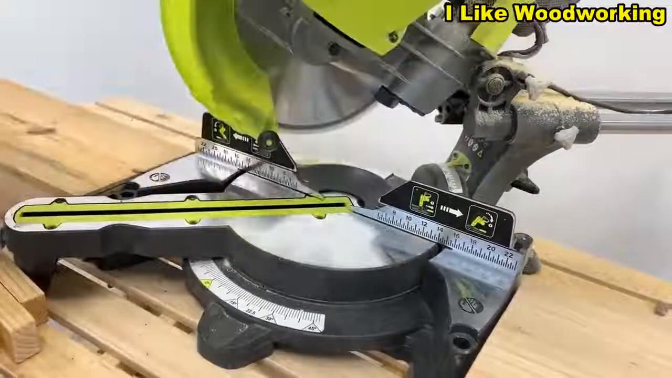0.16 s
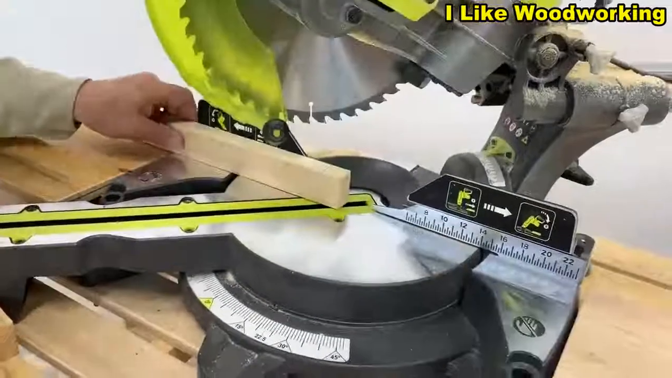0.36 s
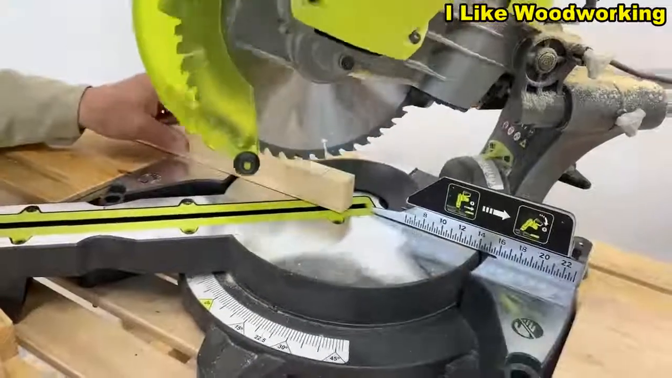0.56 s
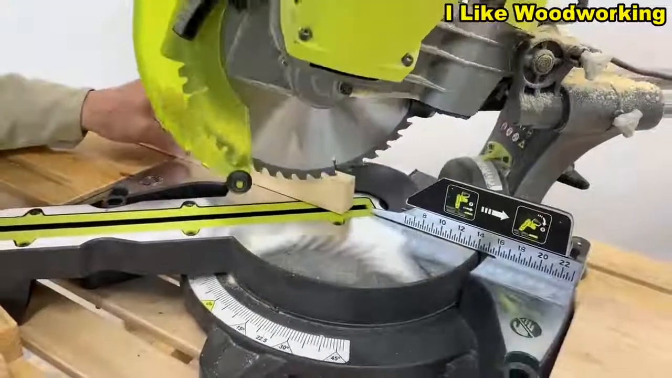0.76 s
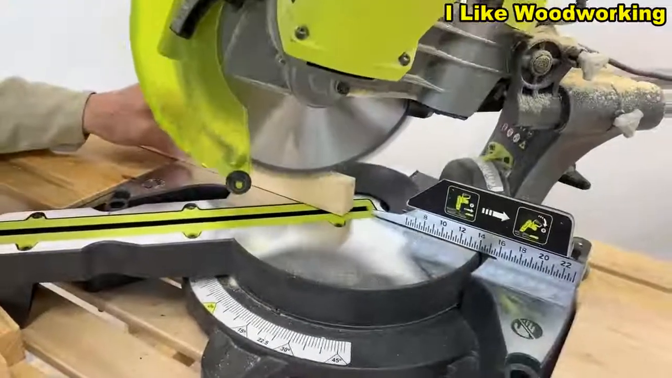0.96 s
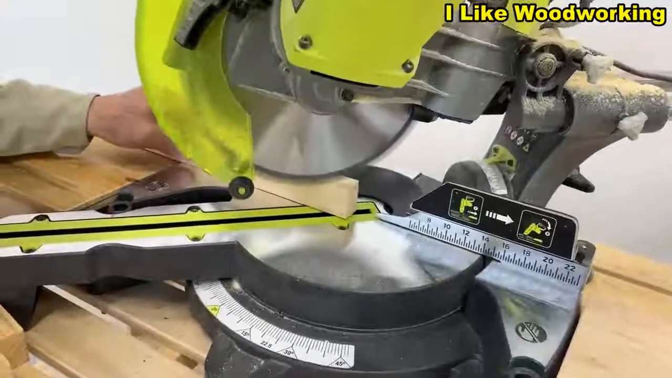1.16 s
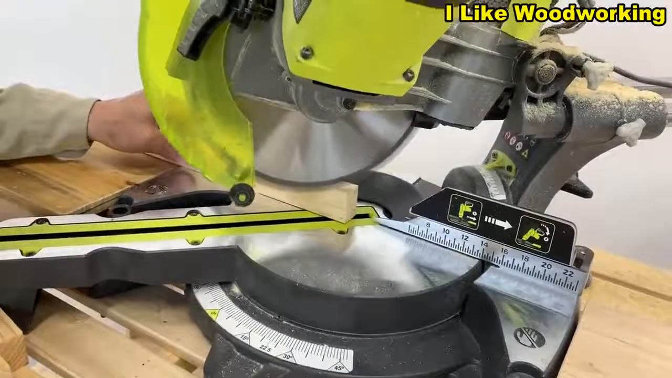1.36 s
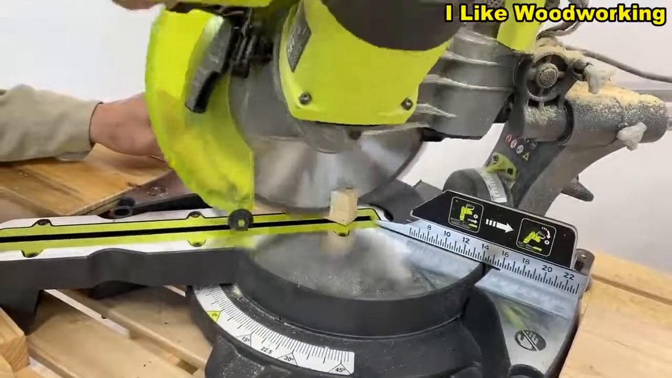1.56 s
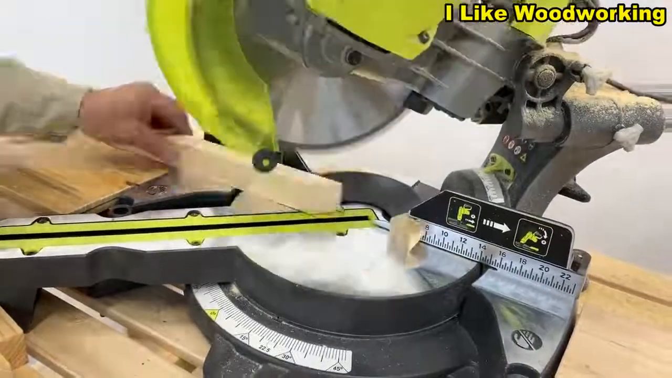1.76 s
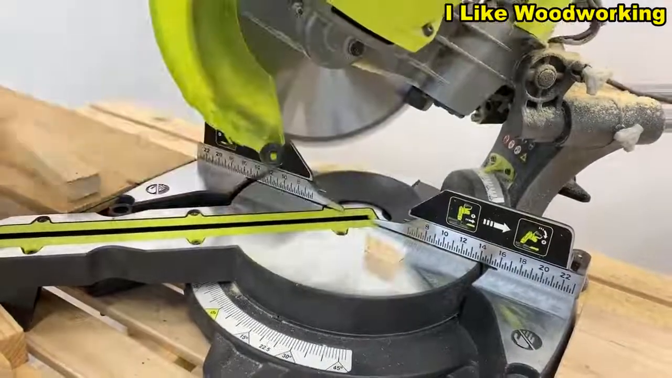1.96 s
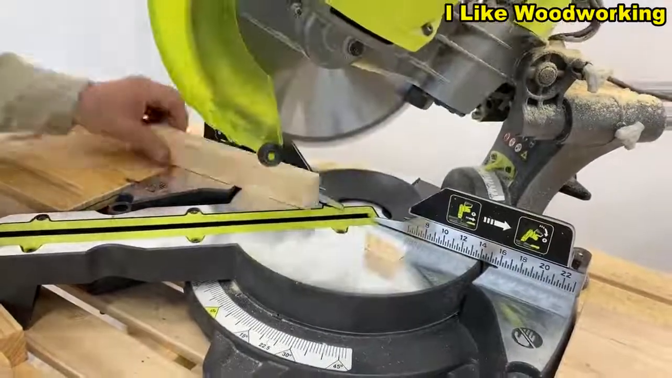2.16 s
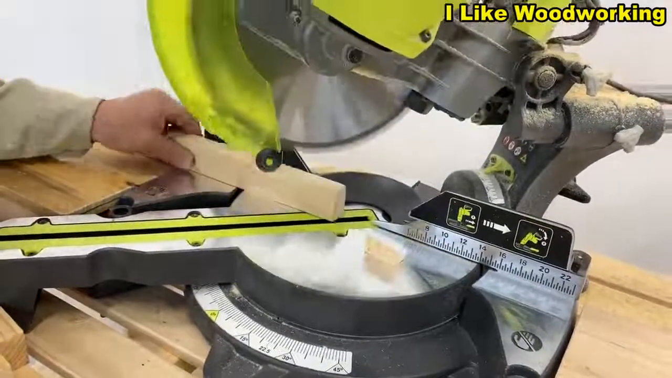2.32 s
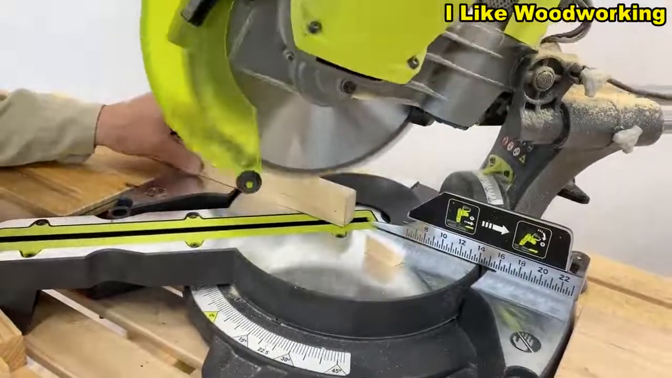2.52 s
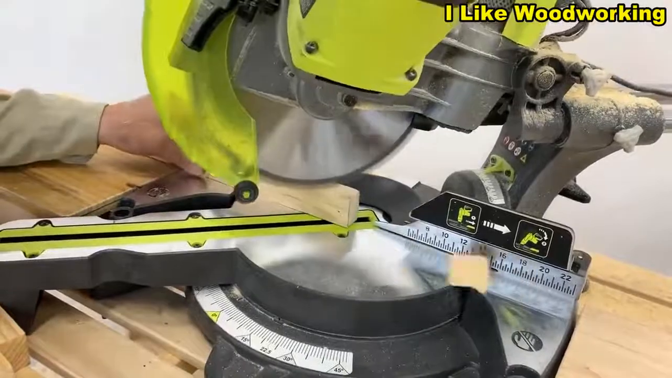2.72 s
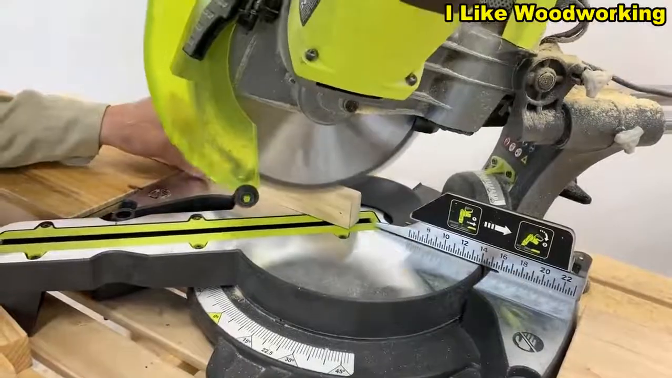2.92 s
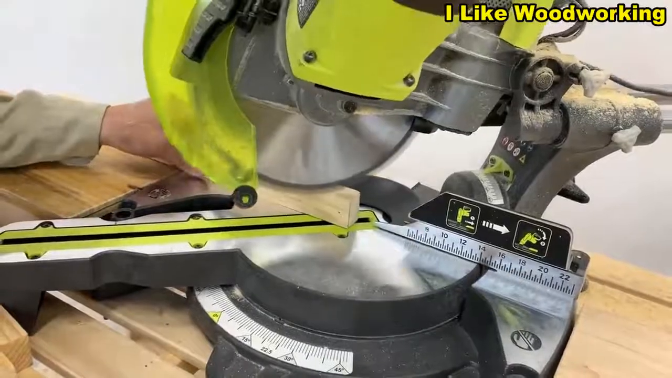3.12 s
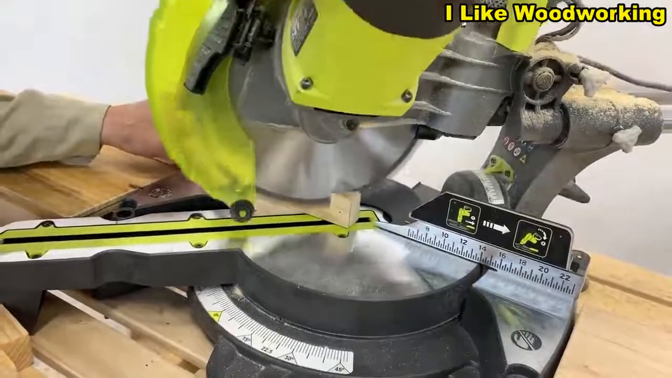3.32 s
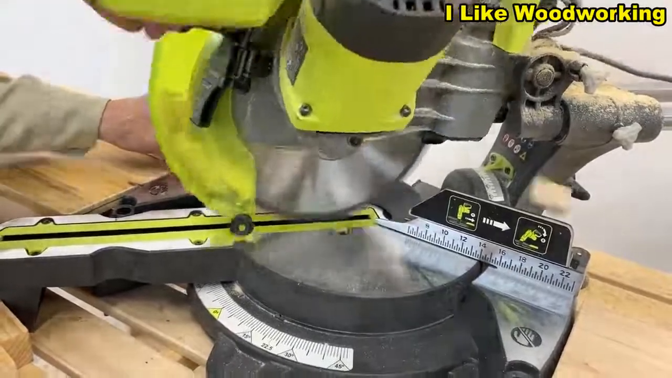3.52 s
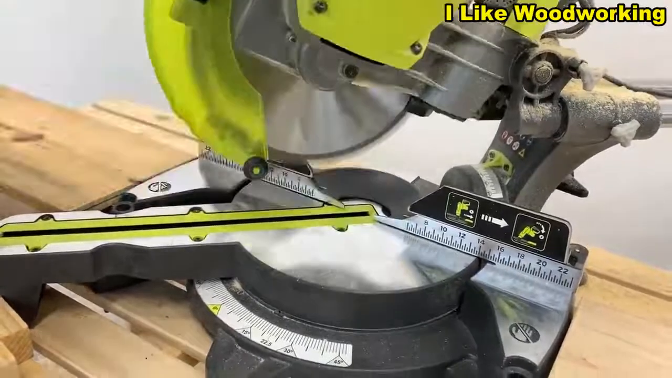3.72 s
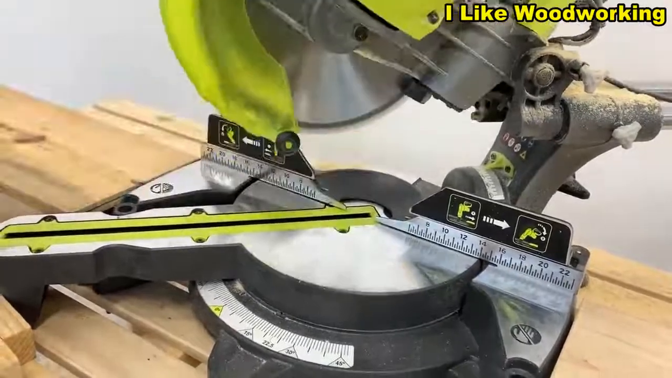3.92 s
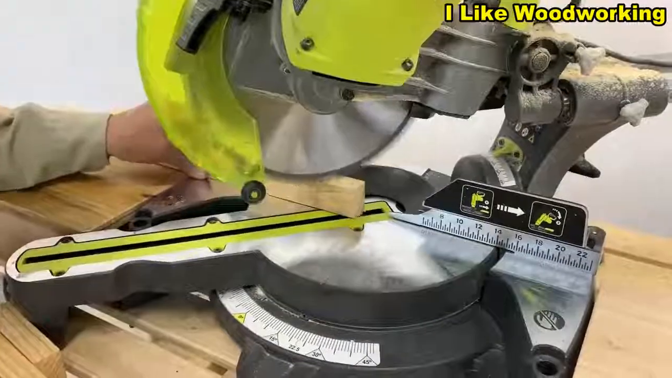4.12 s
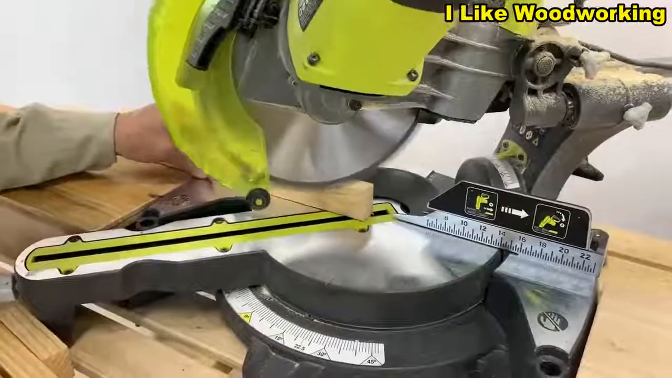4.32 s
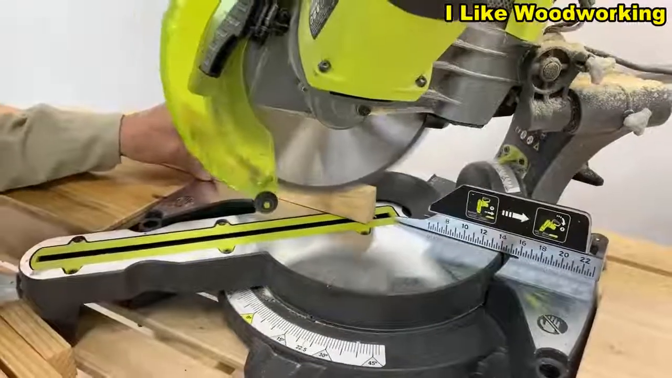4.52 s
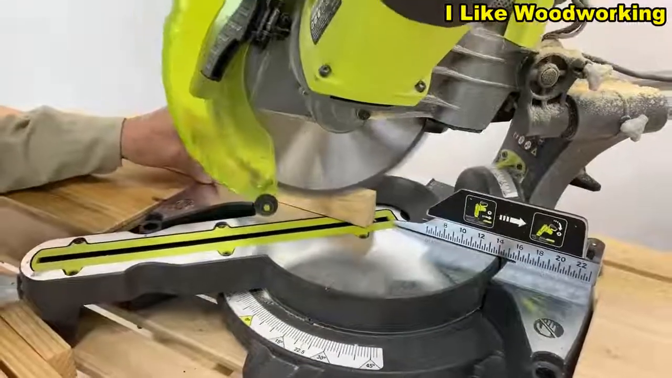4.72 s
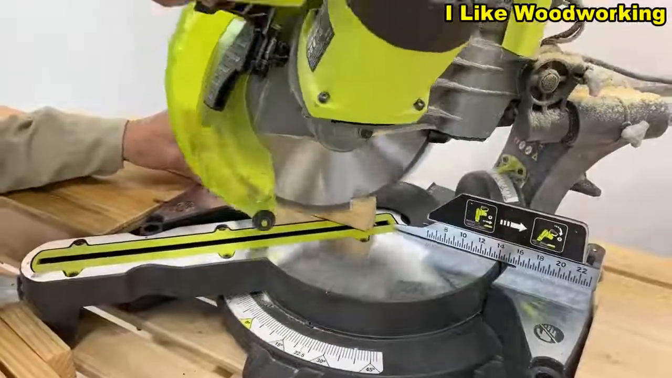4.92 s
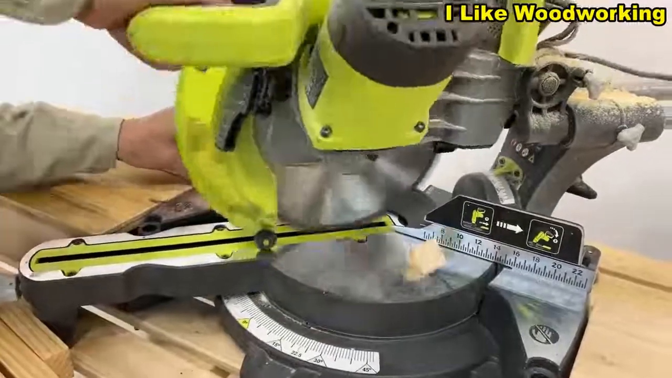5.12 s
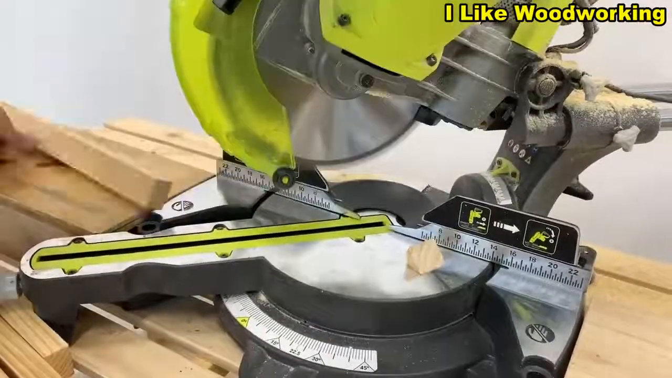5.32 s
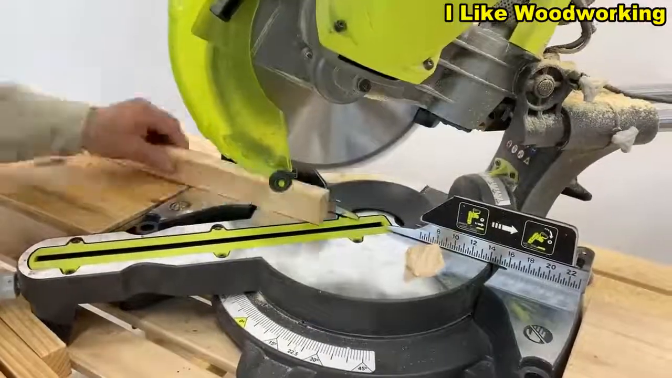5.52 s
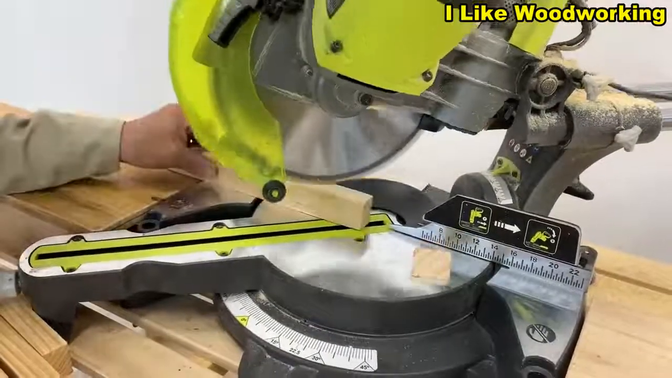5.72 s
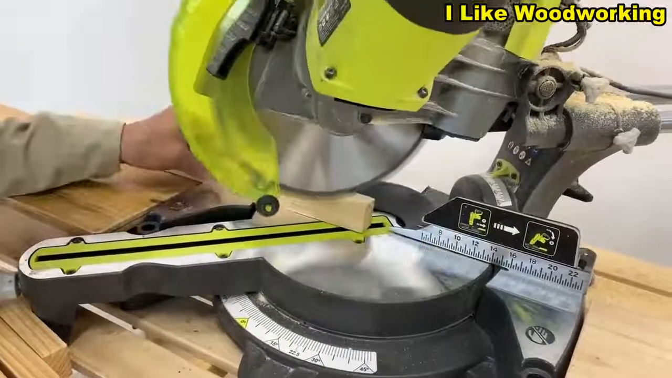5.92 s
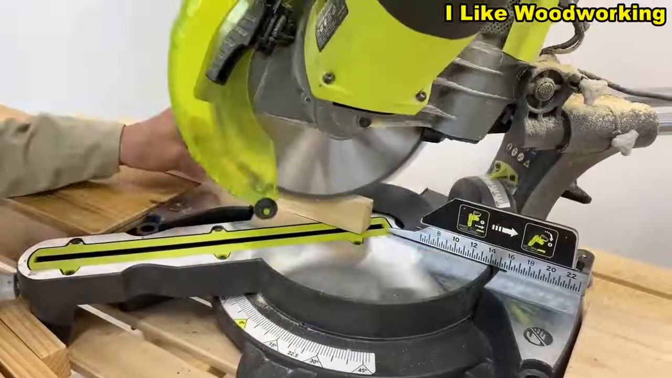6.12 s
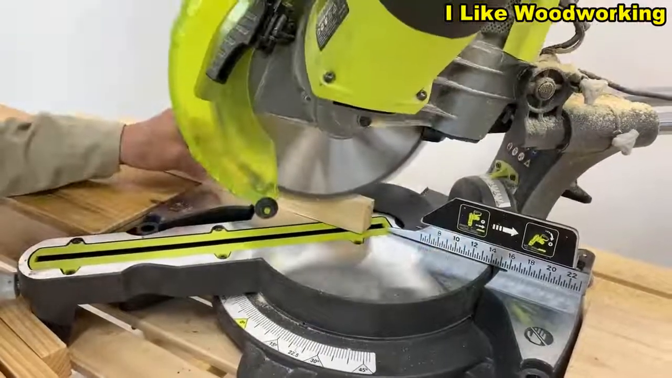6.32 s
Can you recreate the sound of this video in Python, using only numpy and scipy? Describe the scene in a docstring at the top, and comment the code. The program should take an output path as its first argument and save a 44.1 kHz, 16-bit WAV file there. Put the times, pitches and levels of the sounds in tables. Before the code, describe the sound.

Harsh electric saw bursts spin up, cut short wood pieces and brake down in falling whines, with wooden knocks and clacks between them.

```python
"""A miter saw whines down under its brake, then is started again and again, faster and higher than life.
In a workshop, two microphone ports hear fan air and gears as shaped noise and shaft orders as sines tied
to the speed. Starts kick the arm and wood knocks on the bench as ringing modes over a lumpy noise rumble.
Around the last start a mains machine hums from the right as steady harmonics that surge."""
import sys
import numpy as np
from scipy import signal
from scipy.fft import rfft, irfft, next_fast_len
from scipy.io import wavfile
from scipy.ndimage import uniform_filter1d

SR = 44100
rng = np.random.default_rng(int(sys.argv[2]) if len(sys.argv) > 2 else 0)


def transcribe(u):
    """Save the signal u as a 16-bit wav file named by the first command-line argument.

    u: samples, shape (n,) or (channels, n), limited to [-1, 1]; the rate is SR.
    q: integer samples, one column per channel.
    """
    v = np.clip(np.atleast_2d(u).T, -1, 1)
    q = np.round(v * 32767).astype(np.int16)
    wavfile.write(sys.argv[1], SR, q)


N = 285327  # samples
FRAME, HOP = 512, 128  # samples per noise frame and from one frame to the next

# Levels in the tables are relative: the sources set their own trims.
# Noise colour of the saw at high speed: [f/Hz, density/dB per Hz]
RUNNING_COLOUR = [(900, -10.5), (1400, -16), (2000, -6.5), (2500, -7.5), (3050, -11), (3500, -10),
                  (4000, -3), (5100, -1.5), (6000, -3.5), (6800, -4.5), (7900, -5), (9400, -2.5),
                  (11000, -1), (15300, 0.5), (16500, -5.5)]
# Noise colour of the slowed saw: [f/Hz, density/dB per Hz]
SLOWED_COLOUR = [(590, -44), (1000, -37), (1320, -9.5), (1740, -18.5), (1800, -5.5), (2120, -7),
                 (2410, 0.5), (3210, -7.5), (3560, -2.5), (3860, -7.5), (4330, -11), (4650, -9),
                 (7120, -16.5), (8090, -16.5), (15800, -10)]
# Workshop air while the saw is silent: [f/Hz, density/dB per Hz]
QUIET_COLOUR = [(410, -30), (700, -7), (757, -16), (995, -35), (1450, -25), (1910, -21), (5490, -27),
                (15800, -38)]
# Bench rumble: [f/Hz, density/dB per Hz]
BENCH_COLOUR = [(15, -60), (30, -44), (60, -42), (100, -42), (140, -18.5), (190, 0), (280, -1.5), (400, 0),
                (520, -2.5), (720, -3), (900, -3), (1200, -11), (1600, -30)]
# Shaft orders: [multiple of the speed, level running free/dB, pulling hard/dB, braking/dB, blur/rad,
# extra while wood loads the blade/dB]
SHAFT_ORDERS = [(1, -20, -27, -40, .3, 2), (2, -26, -27, -34, .5, 0), (5, -12, -30, -2, .6, 0),
                (7, -26, -19, -36, .9, -6), (8, -24, -30, -34, .5, 0), (9, -25, -26, -36, .5, 2),
                (9.89, -34, -27, -40, .35, 19), (10, -21, -32, -38, .6, -6), (12, -26, -18, -4, .6, 0),
                (24, -36, -36, -10, .7, 0), (48, -40, -40, -16, .8, 0)]
# Housing resonances that lift the orders passing through: [f/Hz, width/Hz, lift/dB]
HOUSING_RESONANCES = [(2500, 700, 7), (3100, 260, 7), (4200, 500, 6), (7300, 1100, 5), (8900, 750, 4),
                      (13600, 600, 8), (14900, 2000, 9), (15600, 500, 5)]
# How far the driven orders stand out, one value per run: [level/dB]
WHINE_DB = (0, 2, 2, -3)
# Motor runs: [switched on t/s, top speed/turns per s, run-up time/s, brake on t/s]
MOTOR_RUNS = [(-2, 1480, .155, .036), (.955, 1555, .155, 2.032), (2.586, 1575, .15, 3.622),
              (4.229, 1546, .18, 9)]
# Cuts in wood: [teeth bite t/s, through t/s, sag/turns per s, recovery/s]
CUTS = [(1.49, 1.735, 90, .11), (3.31, 3.53, 104, .14), (4.96, 5.138, 124, .17)]
# Effort of each run: [level/dB, then excess at the start in air roar/dB, gear growl/dB, airy top/dB,
# bench rumble/dB, swell as the squeal passes/dB]
RUN_EFFORT = [(-0.5, -2, 0, 0, 0, -23), (-0.16, 0, 9.5, -2, 6, 5), (0.074, -6.5, -2.5, -9, -3, 1.5),
              (0.12, 10.5, 19, 6.5, 19.5, 3.5)]
# Time for the start excess to die away: [air roar/s, gear growl/s, airy top/s, bench rumble/s]
SETTLE_S = (.16, .12, 0.096, 0.14)
# Shares of the squeal swell: [air roar, gear growl, airy top, bench rumble]
SQUEAL_SHARE = (1.07, 0.36, 0.98, 0.16)
# The slowing blade passes housing resonances: [speed/turns per s, width/turns per s, air roar/dB,
# gear growl/dB, airy top/dB, bench rumble/dB]
SLOWING_SWELLS = [(1360, 110, 0.19, 4.5, 1, 2), (620, 40, .3, 0, 1, -6), (510, 120, 2.4, 5, 0, -2)]
# The roar steps up, then settles back; a step of 0 dB is silent: [t/s, level/dB, fade/s]
ROAR_STEPS = [(1.89, 0, .15), (5.34, 3.5, 0.2)]
# Shares of the step: [air roar, gear growl, airy top, bench rumble]
STEP_SHARE = (0.98, -0.46, -0.25, -0.43)
# Level of the quiet stretch between runs, with brief bursts and a rise into the start: [t/s, level/dB]
QUIET_LEVEL = [(0.396, -71), (0.404, -46.5), (0.42, -69.5), (0.688, -63.5), (0.714, -58.5), (0.754, -67.5),
               (0.85, -62), (0.914, -65), (0.945, -50.5)]
# Shares of the quiet level's movement: [air roar, gear growl, airy top, bench rumble]
QUIET_SHARE = (0.96, 0.9, 0.91, 0.17)
# Wood knocks: [t/s, level/dB, hardness/dB, crack/dB]
KNOCKS = [(0.307, -33, 1, -6), (0.331, -34.5, 2, -7), (0.398, -40, -7, 7), (0.474, -31.5, -2.5, 3.5),
          (0.52, -47, 2, -7), (0.615, -38.5, 1, -6), (0.662, -37.5, 11, 5), (0.695, -47, -7, -3),
          (0.726, -29, -2, -3), (0.757, -30.5, -3, -11), (0.778, -37.5, 1, -17), (0.882, -38, 2, 0.4),
          (0.92, -31.5, -4.5, 1), (0.948, -27, -5, -6), (1.003, -28.5, 4.5, -1), (1.173, -28, -4, 0.4),
          (1.501, -33.5, 3, 2), (1.815, -31, -4, 0.4), (1.837, -31, 3, 8), (1.872, -25.5, -3, -4),
          (2.356, -28.5, 2, 4), (2.37, -30, -3, -4), (2.383, -29.5, 3.5, 0.4), (2.397, -31, -6, 0.4),
          (2.424, -32, 0.5, 6.5), (2.499, -38, -4, -13), (2.905, -37.5, 1.5, 0.4), (2.94, -34.5, 1.5, 0.4),
          (3.329, -35, 2.3, 8), (3.804, -37.5, 0.5, -4), (3.968, -25, -3.5, 0.4), (4.056, -25.5, 1.7, 4.5),
          (4.192, -28, -5, 13), (4.204, -29, -0.4, 2), (4.409, -24.5, 1.5, 9), (4.541, -35, 7.7, 8),
          (4.764, -35.5, 7.5, 7), (4.848, -33, 0, 0.4), (5.188, -38, 4, 2), (5.319, -36.5, 5.5, 5),
          (5.385, -36, 4.5, 0.4), (6.088, -39.5, 7, -2), (6.364, -25.5, 1.5, 4), (6.399, -33, 5.8, 10)]
# Modes of the wood blocks: [f/Hz, level/dB, t60/s]
WOOD_MODES = [(225, -3, 0.047), (328, 0, 0.042), (463, -1.5, 0.041), (677, 6.5, 0.021), (894, -9.5, 0.082),
              (1140, 10, 0.018), (1547, 10.5, 0.014), (2135, 13.5, 0.016), (3150, 0, .03)]
# Colour of a blow against the low modes: [f/Hz, level/dB, share of the hardness, share of the crack]
BLOW_COLOUR = [(456, -0.5, 0.32, 0), (686, -6, 1.47, 0), (1580, -15.5, 0.55, 0.95), (3200, -23, 0.5, .8)]
# Offcuts flicked against the fence: [t/s, level/dB, tilt/dB per octave]
OFFCUTS = [(2.078, -28, -2), (2.092, -34, -1), (4.418, -26.5, -4), (4.774, -27.5, -6), (5.45, -18.5, -2),
           (6.395, -28, -7)]
# What the offcuts ring with: [f/Hz, level/dB, t60/s]
FENCE_MODES = [(1050, -5, .05), (1400, -8, .03), (1850, -6, .03), (2200, -6, .025), (2600, -10, .02),
               (3160, 0, .055)]
# Saw starts: [t/s, arm ring level/dB, clack level/dB]
STARTS = [(0.955, -29.5, -24.5), (2.589, -35.5, -29.5), (4.23, -21.5, -17.5)]
# Modes of the kicked arm: [f/Hz, level/dB, t60/s]
ARM_MODES = [(386, -2.5, 0.29), (770, -20, 0.27), (201, -15.5, 0.12)]
# Modes of the gear clack: [f/Hz, level/dB, t60/s]
CLACK_MODES = [(5440, 4, 0.014), (4820, -2, 0.024), (2590, -30, 0.01)]
# Slack gears rattle as they take up the load: [f/Hz, width/Hz, t60/s]
GEAR_RATTLE = (5070, 100, 0.82)
# Harmonics of the mains machine: [multiple, level/dB, surge/dB, surge time/s]
HUM_HARMONICS = [(1, -64, 28, 0.16), (5, -56.5, 19, 0.071), (6, -56.5, -3, .1), (7, -52, 17.5, 0.12),
                 (9, -52.5, 21, 0.15)]
# The machine's casing moans as it gathers speed: [f/Hz, level/dB, loudest at t/s, spread/s]
CASING_MOAN = (717, -39, 4.39, .13)
# Port pair towards the saw: [f/Hz, left-right likeness, left minus right/dB, left lead/rad]
SAW_PORTS = [(700, 0.93, -27, -1.3), (1190, 0.21, 1, -1.35), (1930, 0.68, -1, -0.5), (2680, 0.2, -6, 1.5),
             (3320, 0.83, -3, -0.35), (3320, 0.19, 4, 0.85), (3790, 1, -2.5, 1.77),
             (5650, 0.79, 0.5, -0.04), (6060, 0.67, -3, 0.9), (7000, 0.09, 1.5, -0.25),
             (7700, 1, 2.5, -0.74), (8100, 0.25, -5.5, -0.73), (9900, 0.15, 5, 1.95),
             (10440, 0.59, -6.5, 0.86), (12000, 0.3, -1.5, 0.2), (13300, 0.36, 2, 1.3),
             (14500, 0.89, -4, -0.5), (15600, 0.44, 1, 1.2)]
# Port pair towards the bench: [f/Hz, left-right likeness, left minus right/dB, left lead/rad]
BENCH_PORTS = [(50, 0.044, 0.13, .1), (150, 0.1, 0.35, 0.63), (393, 0.95, 0.66, 0.79),
               (690, 0.82, 0.65, 1.33), (1025, 1, 0.17, 2.15), (1890, 0.73, 0.5, 7.8),
               (3130, 0.42, -2.7, 9), (6000, .3, -.5, 12.5)]

KICK_SPEED, BRAKE_FROM, BRAKE_PER_S = 490, 1550, 3550  # turns per s, and their loss per second
COAST_FROM, COAST_TO = 340, 165  # turns per s; the brake lets go, and the level the coast tends to
COAST_AFTER_S, COAST_S = .348, .11  # from the brake to the coast, and the coast's time constant
BREAK_OFF_S = .392  # the saw sound breaks off here and stays out until the next start
# Settings of the four bands: air roar, gear growl, airy top, bench rumble
FREE_DB = (-29, -39.5, -28, -51.5)
QUIET_DB = (2, 1.5, -5, 12)  # against the lowest quiet level
PRESTART_DB = (-36.5, -37, -34.5, -33.5)
LOADED_DB = (-2.8, -0.043, 0.44, 0.48)  # per 110 turns per s of sag
CLEARED_DB = (-3.2, -0.72, -2, -2.2)  # likewise, after the teeth come through
SLOWING_DB = (-27.5, -13.5, -28, -4)  # loss from full speed to none
SLOWING_BEND = (1.19, 1.35, 0.97, 0.27)  # power law on the way
RISE_S = 0.013  # a switch takes this long to be heard in full
HUM_HZ, HUM_S = 181.2, 4.195  # the mains machine's fundamental and its start
EDGE_HZ = 15760  # upper band limit


def amp(db):
    """Decibels to gain."""
    return 10 ** (np.asarray(db) / 20)


def evened(x):
    """Scales to rms 1."""
    return x / np.sqrt(np.mean(x ** 2) + 1e-20)


def read(points, hz):
    """Reads a spectrum on a log frequency axis."""
    f, value = np.transpose(points)
    return np.interp(np.log(hz + 1), np.log(f + 1), value)


def add(mix, s, sound):
    """Mixes a sound in at second s."""
    part = mix[round(s * SR):][:len(sound)]
    part += sound[:len(part)]


def ring(modes, rise):
    """A struck thing: decaying sine modes with random phases and a soft onset of rise seconds."""
    t = np.arange(SR // 2) / SR
    tones = 0
    for hz, db, t60 in modes:
        tones = tones + amp(db - 60 * t / t60) * np.sin(2 * np.pi * (hz * t + rng.random()))
    return tones * (1 - np.exp(-(t / rise) ** 2))


def noise(colour_db, lo_hz, hi_hz, patchy_db, flicker_db):
    """Two unrelated noises of one soft-edged band with drifting patches and flicker; colour is bins x frames."""
    hz = np.fft.rfftfreq(FRAME, 1 / SR)[:, None] + 1
    frames = N // HOP + 5
    a, b, c, d, patches = rng.standard_normal((frames, FRAME // 2 + 1, 5)).T
    patches = uniform_filter1d(patches, size=3, axis=0)
    patches = evened(uniform_filter1d(patches, size=16, axis=1))
    flicker = evened(uniform_filter1d(rng.standard_normal(frames), size=4))
    shape = amp(colour_db) / np.sqrt((1 + (lo_hz / hz) ** 20) * (1 + (hz / hi_hz) ** 20))
    shape = shape / np.sqrt((shape ** 2).mean(0))  # every frame equally strong before the flicker
    shape = shape * amp(patchy_db * patches + flicker_db * flicker)
    spectra = np.array([a + 1j * b, c + 1j * d]) * shape
    pair = signal.istft(spectra, nperseg=FRAME, noverlap=FRAME - HOP)[1][:, :N]
    return evened(pair)


def load(t):
    """Speed lost to the wood in turns per s, while the teeth cut and while the motor recovers."""
    cutting = sum(sag * np.clip((t - a) / (b - a), 0, 1) ** 1.4 * (t < b) for a, b, sag, _ in CUTS)
    freed = sum(sag * np.exp(-abs(t - b) / back) * (t >= b) for _, b, sag, back in CUTS)
    return cutting, freed


def motor(t):
    """Armature: an exponential run-up sags under load; a linear brake, then a coast, caps the speed.

    Returns which run is on, seconds since its start, the speed and the limit that the brake sets."""
    run = np.searchsorted([r[0] for r in MOTOR_RUNS], t, "right") - 1
    on, top, rise, brake = np.array(MOTOR_RUNS)[run].T
    free = top - (top - KICK_SPEED) * np.exp(-(t - on) / rise) - sum(load(t))
    coasting_s = np.maximum(t - brake - COAST_AFTER_S, -COAST_S)
    coast = COAST_TO + (COAST_FROM - COAST_TO) * np.exp(-coasting_s / COAST_S)
    limit = np.maximum(BRAKE_FROM - BRAKE_PER_S * (t - brake), coast)
    return run, t - on, np.minimum(free, limit), limit


def sounding(t):
    """1 while the saw is heard, else 0."""
    return 1. * ((t < BREAK_OFF_S) | (t >= MOTOR_RUNS[1][0]))


def levels(t):
    """Gain of the four bands from effort, load, braking, roar steps and the quiet between runs."""
    run, since, speed, limit = motor(t)
    effort = np.array(RUN_EFFORT)[run]
    cutting, freed = load(t)
    slowed = np.clip(1 - limit / BRAKE_FROM, 0, 1)[:, None]
    braking = speed >= limit
    db = FREE_DB + effort[:, :1] + effort[:, 1:5] * np.exp(-since[:, None] / np.abs(SETTLE_S))
    squeal_db = effort[:, 5] * np.exp(-((speed - 1240) / 130) ** 2) * ~braking
    db += np.outer(squeal_db, SQUEAL_SHARE)
    db += np.outer(cutting / 110, LOADED_DB) + np.outer(freed / 110, CLEARED_DB)
    db += SLOWING_DB * slowed ** np.array(SLOWING_BEND)
    for at, width, *bands in SLOWING_SWELLS:
        db += np.outer(braking * np.exp(-((speed - at) / width) ** 2), bands)
    step_db = sum(up * np.exp(-abs(t - s) / fade) * (t > s) for s, up, fade in ROAR_STEPS)
    db += np.outer(step_db, STEP_SHARE)
    course_db = np.interp(t, *np.transpose(QUIET_LEVEL))
    lowest_db = course_db.min()
    quiet_db = lowest_db + QUIET_DB + np.outer(course_db - lowest_db, QUIET_SHARE)
    quiet = sounding(t) == 0
    db[quiet] = quiet_db[quiet]
    db[(t > HUM_S) & (t < MOTOR_RUNS[-1][0])] = PRESTART_DB  # the mains machine switches on with a rush
    return amp(uniform_filter1d(db.T, size=max(round(RISE_S * SR), 1), axis=1))


def roar():
    """Fan air and gear mesh: broad noise in the housing, its colour shifting as the blade slows."""
    t, frames = np.arange(N) / SR, np.arange(N // HOP + 5) * HOP / SR
    hz = np.fft.rfftfreq(FRAME, 1 / SR)
    speed, level = motor(frames)[2], levels(t)
    fast = np.clip((speed - 500) / 600, 0, 1)
    turning_db = np.outer(read(RUNNING_COLOUR, hz), fast) + np.outer(read(SLOWED_COLOUR, hz), 1 - fast)
    # at full speed the fan hisses in the vent slots
    full = np.clip((speed - 1490) / 50, 0, 1)
    turning_db += np.outer(4.5 / (1 + ((hz - 8100) / 700) ** 4), full)
    # in the run-up the seventh order drags a rough squeal through a housing resonance
    passing = np.exp(-((speed - 1260) / 120) ** 2) * (np.gradient(speed) > 0)
    squeal_hz = (7 * speed + 8900) / 2
    turning_db += 10 * passing / (1 + ((hz[:, None] - squeal_hz) / 400) ** 4)
    heard = sounding(frames)
    colour_db = turning_db * heard + np.outer(read(QUIET_COLOUR, hz), 1 - heard)
    # gear teeth chatter: short random bursts, about 250 per s, ride on the roar
    bursts = rng.exponential(1, N) * (rng.random(N) < 250 / SR)
    chatter = 1 + 0.32 * signal.lfilter([1], [1, -np.exp(-1 / (0.00035 * SR))], bursts)
    air = noise(colour_db, 3910, 9370, patchy_db=2.0, flicker_db=0.52) * level[0]
    growl = noise(colour_db, 1100, 3860, patchy_db=1.5, flicker_db=1.2) * level[1]
    top = noise(colour_db, 9150, 17900, patchy_db=3.0, flicker_db=0.5) * level[2]
    return amp(0.5) * (air + growl + top) * chatter


def whine():
    """Shaft orders are sines at multiples of the speed; pulling and braking stress different ones."""
    t = np.arange(N) / SR
    run, _, speed, _ = motor(t)
    speed = uniform_filter1d(speed, size=1500)
    slope = uniform_filter1d(np.gradient(speed) * SR / speed, size=2500)  # relative change per second
    braking = np.clip((-slope - .8) / .7, 0, 1)
    pulling = np.clip((1545 - speed) / 60, 0, 1) * (1 - braking)
    cutting = np.clip(-slope / .35, 0, 1) * (1 - braking)  # the speed sags gently under load
    # early in the braking the fan air still covers the lines; early in the run-up they have not yet grown
    masked_db = -13 * braking * speed / 1500 - 40 * pulling * np.clip(1 - speed / 1050, 0, 1)
    masked_db += np.take(WHINE_DB, run) * (1 - braking)
    dying_db = -30 * np.clip(1 - speed / 460, 0, 1)
    turns = np.cumsum(speed) / SR
    out = np.zeros((2, N))
    for k, free_db, pull_db, brake_db, blur, cut_db in SHAFT_ORDERS:
        hz = k * speed
        level_db = free_db * (1 - pulling - braking) + pull_db * pulling + brake_db * braking + masked_db
        level_db += sum(db / (1 + (2 * (hz - f) / w) ** 2) for f, w, db in HOUSING_RESONANCES)
        level_db += cut_db * cutting + dying_db * (hz < 4500)  # low lines die with the speed
        # the shaft wobbles, so each line wavers in strength and in phase at either port
        wobble = []
        for wander in rng.standard_normal((N // 64 + 2, 3)).T:
            smooth = evened(uniform_filter1d(wander, size=5))
            wobble.append(np.interp(t, np.arange(len(wander)) * 64 / SR, smooth))
        tone = np.sin(2 * np.pi * k * turns + blur * np.array(wobble[:2]))
        out += tone * amp(level_db + 2.9 * wobble[2]) * (hz < EDGE_HZ)
    return out * levels(t)[0] * sounding(t)


def bench():
    """Low lumpy noise of wood sliding, and a deep noise of the stand shaking with the air roar's level."""
    colour_db = read(BENCH_COLOUR, np.fft.rfftfreq(FRAME, 1 / SR))[:, None]
    air, _, _, rumble = levels(np.arange(N) / SR)
    flat_db = np.zeros((FRAME // 2 + 1, 1))
    shake = noise(flat_db, 5, 90, patchy_db=4.5, flicker_db=5.0) * air * amp(-51)
    return noise(colour_db, 25, 1250, patchy_db=4.5, flicker_db=1.65) * rumble * amp(2.0) + shake


def knocks():
    """Wood rings on bench and fence; hardness and crack colour a block's blow, the grip shifts its low modes."""
    out = np.zeros(N)
    for s, db, hard_db, crack_db in KNOCKS:
        colour = [(hz, d + hard * hard_db + crack * crack_db) for hz, d, hard, crack in BLOW_COLOUR]
        grip = rng.uniform(0.892, 1.137)
        modes = []
        for hz, d, t60 in WOOD_MODES:
            modes.append((hz * (grip if hz < 1000 else 1), d + read(colour, hz), t60))
        add(out, s, amp(db - 1.0) * ring(modes, rise=0.0022))
    for s, db, tilt_db in OFFCUTS:
        modes = [(hz, d + tilt_db * np.log2(hz / 1850), t60) for hz, d, t60 in FENCE_MODES]
        add(out, s, amp(db) * ring(modes, rise=0.0013))
    return out


def kicks():
    """Each start rings the arm, clacks the gears and leaves them rattling as decaying resonant noise."""
    arm, gears = np.zeros(N), np.zeros(N)
    hz, width, t60 = GEAR_RATTLE
    t = np.arange(SR // 2) / SR
    for s, arm_db, clack_db in STARTS:
        add(arm, s, amp(arm_db + 5.0) * ring(ARM_MODES, rise=0.0033))
        rattle = evened(signal.lfilter(*signal.iirpeak(hz, hz / width, SR), rng.standard_normal(len(t))))
        rattle = rattle * amp(clack_db - 13.5 - 60 * t / t60)
        add(gears, s, amp(clack_db + 4.5) * ring(CLACK_MODES, rise=0.00065) + rattle)
    return arm, gears


def hum():
    """Fixed harmonics of a mains machine, most surging as it starts, and a swelling moan of its casing."""
    t = np.arange(N) / SR - HUM_S
    tones = 0
    for k, db, surge_db, fade in HUM_HARMONICS:
        level_db = db + 3.5 + surge_db * np.exp(-abs(t) / fade)
        tones = tones + amp(level_db) * np.sin(2 * np.pi * (k * HUM_HZ * t + rng.random()))
    hz, db, s, spread = CASING_MOAN
    moan = amp(db) * np.exp(-((t + HUM_S - s) / spread) ** 2) * np.sin(2 * np.pi * hz * t)
    return (tones + moan) * np.clip(t / 0.0042, 0, 1)


def room(x):
    """Workshop reflections: two short decaying tails of sparse random taps, one per port."""
    t = np.arange(SR // 3) / SR
    signs = rng.choice([-1., 1.], (2, len(t)))
    taps = signs * (rng.random((2, len(t))) < 2000 / SR) * amp(-60 * t / 0.28) * (t > .004)
    return signal.fftconvolve(x[None], taps / np.linalg.norm(taps[0]), axes=1)[:, :N]


def ports(pair, table):
    """Two microphone ports: part of the sound is shared, with a balance and a phase lead per frequency."""
    size = next_fast_len(N)
    hz = np.fft.rfftfreq(size, 1 / SR)
    same, left_db, lead = (read(np.array(table)[:, [0, k]], hz) for k in range(1, 4))
    same = np.clip(same, 0, 1)
    a, b = rfft(pair, size)
    tilt = amp(left_db / 2) * np.exp(.5j * lead)
    left, right = a * tilt, (same * a + np.sqrt(1 - same ** 2) * b) / tilt
    return irfft(np.array([left, right]), size)[:, :N]


def scene():
    """Saw and bench through the port pair, with the mains machine off to the right."""
    arm, gears = kicks()
    near = arm + knocks()
    saw = roar() + whine() + gears + amp(4) * room(gears)
    machine = hum()
    far = np.array([np.roll(machine, 7), machine])  # the left port hears it 7 samples later
    on_bench = bench() + near + amp(-2) * room(near)
    return ports(saw, SAW_PORTS) + ports(on_bench, BENCH_PORTS) + far


def record(dry):
    """The band limit: a steep low-pass on both channels."""
    low_pass = signal.firwin(767, EDGE_HZ, window=("kaiser", 9), fs=SR)
    return signal.oaconvolve(dry, low_pass[None], "same")


dry = scene()
out = record(dry)
transcribe(out)
```